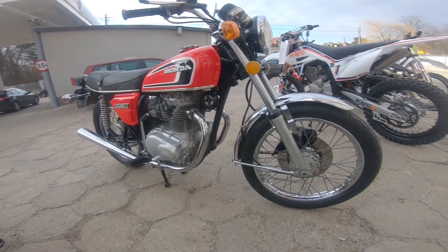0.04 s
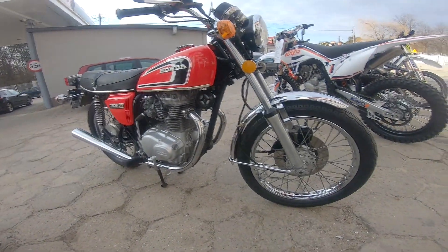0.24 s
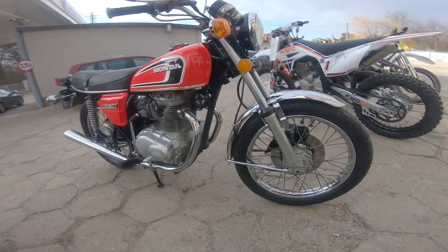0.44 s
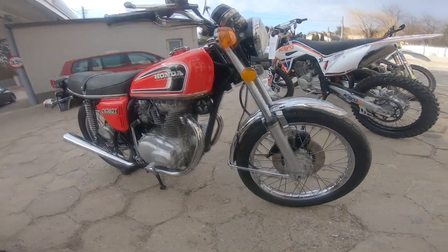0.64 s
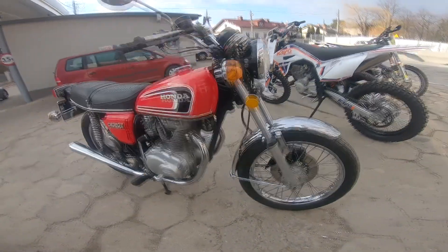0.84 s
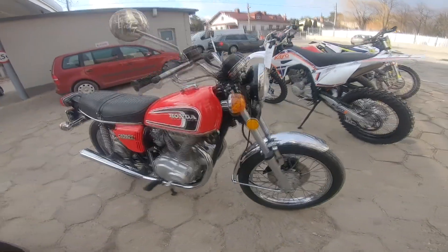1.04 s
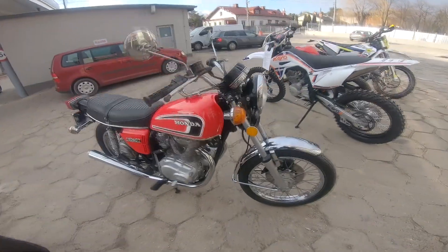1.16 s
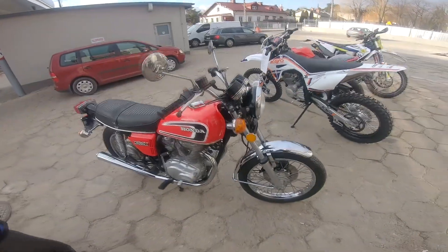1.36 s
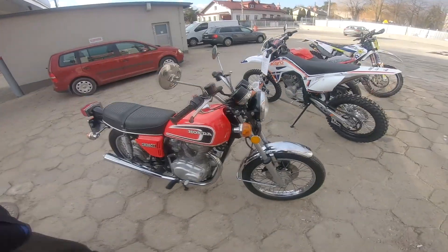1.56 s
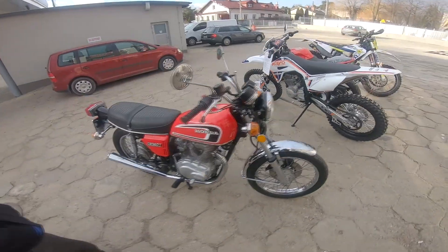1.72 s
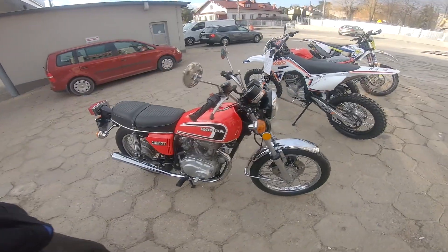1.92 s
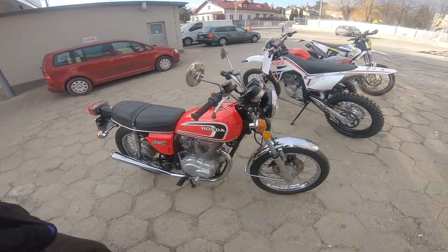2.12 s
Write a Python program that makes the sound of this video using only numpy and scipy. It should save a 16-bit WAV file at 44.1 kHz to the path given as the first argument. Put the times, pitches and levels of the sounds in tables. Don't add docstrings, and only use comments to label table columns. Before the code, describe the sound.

A twin-cylinder motorcycle idles throughout, close and dry in an open paved yard. Weak misfires stumble for the first 0.2 seconds, then paired low exhaust thuds gallop at about thirteen cycles a second, with short raspy barks and slight dropouts near 0.7, 0.8 and 1.1. Chain and valve clatter runs constantly, its bright ringing shifting around 0.9-1.5 and partly returning. Low intake rumble wavers underneath.

```python
import sys
import numpy as np
from scipy import signal
from scipy.fft import rfft, irfft
from scipy.io import wavfile
from scipy.ndimage import uniform_filter1d

SR = 44100
rng = np.random.default_rng(int(sys.argv[2]) if len(sys.argv) > 2 else 0)


def voltage_ratio(decibels):
    exponent = np.asarray(decibels, float) / 20
    return 10 ** exponent


def generate_wav(sig):
    pcm = np.round(np.clip(np.atleast_2d(sig).T, -1, 1) * 32767).astype(np.int16)
    wavfile.write(sys.argv[1], SR, pcm)


N = 96446

# start [t/s], first cylinder [level/dB], second cylinder [level/dB]
CYCLES = [(-0.0282, -19, -34), (0.0429, -40, 3), (0.118, 1, -26.0), (0.1962, -2, 3.5), (0.273, 0.5, 0.9),
          (0.349, 2.5, 2), (0.4211, -0.5, 2.5), (0.4955, -1, 3), (0.569, -2, 3.0), (0.645, 0, 3),
          (0.722, -11.5, 3.1), (0.8004, 0.5, -31), (0.8771, 1, 3.5), (0.9523, 1, -2), (1.0304, 2, 3.5),
          (1.1074, 3.5, -43), (1.1833, 1.5, 2.5), (1.258, -0.8, 0), (1.3327, 1, 3), (1.4045, -0.5, -0.5),
          (1.4777, 0.5, 2.5), (1.5495, -1.7, -3), (1.625, 0.5, 2), (1.6985, -3.5, -2), (1.7744, -0.8, 1.5),
          (1.8473, -2.3, -2), (1.9237, 0.3, -0.2), (1.9972, -6, -0.1), (2.0764, 0, 2), (2.1487, -1, 1)]
# [t/s], [level/dB]
STRAY_BURNS = [
    (.0005, -2.5),
    (0.04, -6.5),
    (0.153, -17),
    (.193, -7),
    (.836, -11.5),
    (1.1518, -14),
    (2.036, -24),
]
# [f/Hz], [t60/s], first cylinder [level/dB], second cylinder [level/dB]
SILENCER_MODES = [(80.6, 0.1, -2, -3.5), (107.1, 0.33, -6, -11), (128.1, 0.077, 6, 1.6),
                  (210.5, 0.086, -14.5, -12.5), (268.1, 0.13, -47.5, -3.5)]
# [f/Hz], [width/Hz], [level/dB]
PIPE_ENDS = [(566, 91, 2), (760, 230, 3.5), (1010, 220, -9), (1820, 370, -4.5)]
# [share of cycle], over chain noise [level/dB], decay [t/s]
VALVE_CONTACTS = [
    (.0, 4.5, 0.004),
    (0.228, -1.5, 0.009),
    (0.483, 4, 0.01),
    (0.842, -5, .005),
]
# [f/Hz], [width/Hz], [level/dB], change when turned away [level/dB]
FINS = [(568, 50, -60.5, 15.5), (1079, 90, -51.5, -13.5), (1501, 98, -54, -9), (1913, 106, -54, 0),
        (5080, 64, -52, -0.5), (5723, 120, -44.5, -8.5), (6076, 340, -50, -21), (6360, 120, -52, -15),
        (7130, 82, -56, -10), (7550, 100, -56, 3), (8080, 82, -60.5, 9.5), (10210, 100, -55.5, -5),
        (10715, 150, -56, -9)]
# [t/s], [share 0-1]
CAMERA_TURN = [
    (0, 0),
    (.45, 0),
    (.9, 0),
    (1.3, 0.46),
    (1.5, 1),
    (2.19, 0.2),
]
# [t/s], [level/dB]
CLATTER_LEVEL = [(0.0, -39), (0.47, -37), (0.7, -39), (0.76, -36.5), (1.55, -38.5), (2.12, -37),
                 (2.13, -36.5), (2.18, -37)]
# [f/Hz], [level/dB per Hz]
CASE_SPECTRUM = [(150, -14), (300, -4.5), (400, -6), (600, -4.5), (1200, -9), (2200, -15), (4000, -15.5),
                 (6000, -35)]
# [f/Hz], [level/dB per Hz]
COVER_SPECTRUM = [(3000, -42), (4700, -20), (6500, -25.5), (9500, -29.5), (10800, -33), (11500, -40.5),
                  (13900, -35), (14900, -56)]
# [f/Hz], [level/dB per Hz]
RUMBLE_SPECTRUM = [(20, -13), (36, 1.5), (60, -5.5), (150, -0.5), (240, -3), (400, -28.5), (1000, -37),
                   (4000, -94)]
# [f/Hz], [likeness 0-1]
PORT_LIKENESS = [(60, 0.86), (180, 0.97), (400, 0.87), (800, 0.67), (1600, 0.1), (4800, 0.65), (9000, 0.23),
                 (14400, .1)]
# [f/Hz], left minus right [level/dB]
PORT_BALANCE = [(60, -.4), (290, -.2), (700, -1), (1370, -1.2), (3000, -.3), (6000, -5), (9000, -4.5),
                (11500, -8)]

SECOND_SHARE = 0.248
BLOWDOWN_S = 0.0056


def in_time(rows):
    return np.interp(np.arange(N) / SR, *np.transpose(rows))


def at_hz(points, hz):
    point_hz, value = np.transpose(points)
    return np.interp(np.log(hz + 1), np.log(point_hz), value)


def rms_one(x):
    return x / np.sqrt(np.mean(x ** 2) + 1e-20)


def drift(rate_hz):
    r = np.exp(-80 * np.pi * rate_hz / SR)
    noise = rng.standard_normal(N // 40 + 1002)
    slow = signal.lfilter([1], [1, -2 * r, r * r], noise)[1000:]
    return np.interp(np.arange(N) / 40, np.arange(len(slow)), rms_one(slow))


def puffs(times_s, gains, decay_s):
    lead = SR // 10
    impulses = np.zeros(N + 2 * lead)
    index = np.clip((times_s * SR).astype(int) + lead, 0, N + lead)
    np.add.at(impulses, index, gains)
    return signal.lfilter([1], [1, -np.exp(-1 / (decay_s * SR))], impulses + 1e-18)[:N + lead]


def resonate(x, hz, width_hz):
    r = np.exp(-np.pi * width_hz / SR)
    poles = [1, -2 * r * np.cos(2 * np.pi * hz / SR), r * r]
    return signal.lfilter([(1 - r * r) / 2, 0, (r * r - 1) / 2], poles, x)


def colour(x, gain_db):
    return irfft(rfft(x) * voltage_ratio(gain_db), N)


def dull(x, hz):
    return signal.sosfilt(signal.butter(4, hz, fs=SR, output="sos"), x)


def timing():
    start_s, first_db, second_db = np.transpose(CYCLES)
    gap_s = np.diff(start_s)
    return start_s, np.append(gap_s, gap_s[-1]), first_db, second_db


def exhaust():
    flutter_db = -45.5
    start_s, length_s, first_db, second_db = timing()
    stray_s, stray_db = np.transpose(STRAY_BURNS)
    first = puffs(np.append(start_s, stray_s), voltage_ratio(np.append(first_db, stray_db)), BLOWDOWN_S)
    second = puffs(start_s + SECOND_SHARE * length_s, voltage_ratio(second_db), BLOWDOWN_S)
    turbulence = voltage_ratio(flutter_db - 21.5) * rng.standard_normal(len(first))
    out = 0
    for k, (hz, t60_s, a_db, b_db) in enumerate(SILENCER_MODES):
        r, w = voltage_ratio(-60 / (t60_s * SR)), 2 * np.pi * hz / SR
        blowdown = (voltage_ratio(a_db) * first + voltage_ratio(b_db) * second) / (BLOWDOWN_S * SR)
        ring = signal.lfilter([0, np.sin(w)], [1, -2 * r * np.cos(w), r * r], blowdown + turbulence)
        out = out + (1 if k < 2 else -1) * ring
    return dull(out, hz=970)[-N:]


def bark():
    lag_s, decay_s, level_db = 0.005, 0.0059, -33
    steepness, first_offset_db, spread_db = 2.86, -5, 1.2
    start_s, length_s, first_db, second_db = timing()
    firing_s = np.append(start_s, start_s + SECOND_SHARE * length_s)
    firing_db = np.append(steepness * first_db + first_offset_db, steepness * second_db)
    firing_db = firing_db + spread_db * rng.standard_normal(len(firing_s))
    gate = uniform_filter1d(puffs(firing_s + lag_s, voltage_ratio(firing_db), decay_s)[-N:], size=90)
    burst = gate * (0.65 + rng.standard_normal((2, N))) * [[1], [0.6]]
    out = sum(voltage_ratio(db) * resonate(burst, hz, width_hz) for hz, width_hz, db in PIPE_ENDS)
    return voltage_ratio(level_db + 12) * dull(out, hz=2620)


def valve_swell():
    spread_db = 1.8
    start_s, length_s, _, _ = timing()
    swell = 0
    for share, db, decay_s in VALVE_CONTACTS:
        hit_db = db + spread_db * rng.standard_normal(len(start_s))
        hit = puffs(start_s + share * length_s, voltage_ratio(hit_db), decay_s)[-N:]
        swell = swell + uniform_filter1d(hit, size=300)
    return swell


def chain():
    grains_per_s, grain_db, smooth = 1500, 2, 0.84
    sizes = voltage_ratio(grain_db * np.minimum(rng.exponential(1, (2, N)), 4))
    sizes = sizes * rng.choice([-1, 1], (2, N))
    grains = rms_one(sizes * (rng.random((2, N)) < grains_per_s / SR))
    return grains + smooth * rng.standard_normal((2, N))


def clatter():
    case_db, cover_db, case_swell, fin_patch_db = 2.5, -1.5, 0.46, 4.5
    swell = valve_swell()
    drive = rms_one((1 + swell) * chain())
    mild = (1 + case_swell * swell) * voltage_ratio(1.2 * drift(33.0)) * rng.standard_normal((2, N))
    hz = np.fft.rfftfreq(N, 1 / SR)
    near_db, turn = in_time(CLATTER_LEVEL), in_time(CAMERA_TURN)
    case = dull(colour(mild, at_hz(CASE_SPECTRUM, hz)), hz=7300)
    bass_loss_db = 20 * np.log2(1 + (2500 / (hz + 1)) ** 2)
    cover = colour(drive, at_hz(COVER_SPECTRUM, hz) - bass_loss_db)
    out = voltage_ratio(near_db + case_db) * rms_one(case) + voltage_ratio(near_db + cover_db) * rms_one(cover)
    for fin_hz, width_hz, db, change_db in FINS:
        source = drive if fin_hz > 4000 else mild
        ring = resonate(resonate(source, fin_hz, width_hz), fin_hz, 3 * width_hz)
        out = out + voltage_ratio(db + change_db * turn + fin_patch_db * drift(20.0)) * rms_one(ring)
    return out


def rumble():
    level_db = -35
    gain_db = at_hz(RUMBLE_SPECTRUM, np.fft.rfftfreq(N, 1 / SR))
    low = colour(rng.standard_normal((2, N)), gain_db)
    return voltage_ratio(level_db + 4.5 * drift(2.7)) * rms_one(low)


def ports(mid, side):
    lag_s = -2.2e-5
    hz = np.fft.rfftfreq(N, 1 / SR)
    alike = np.clip(at_hz(PORT_LIKENESS, hz), 0, 1)
    balance = voltage_ratio(at_hz(PORT_BALANCE, hz) / 2)
    m = rfft(mid) * np.sqrt((1 + alike) / 2)
    s = rfft(side) * np.sqrt((1 - alike) / 2)
    left = (m + s) * balance * np.exp(-2j * np.pi * hz * lag_s)
    right = (m - s) / balance
    return np.array([irfft(left, N), irfft(right, N)])


def scene():
    thud = exhaust()
    mid, side = bark() + clatter() + rumble()
    return ports(mid + thud, side)


def band_limit(x):
    return signal.sosfilt(signal.butter(12, 14960, fs=SR, output="sos"), x)


def record(dry):
    top_cut = signal.sosfilt(signal.cheby2(8, 60, 15700, fs=SR, output="sos"), dry)
    mix = signal.sosfilt(signal.butter(2, 30, "high", fs=SR, output="sos"), top_cut)
    return band_limit(mix)


dry = scene()
out = record(dry)
generate_wav(out)
```